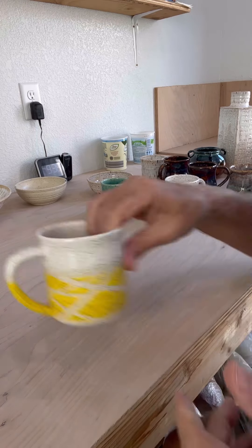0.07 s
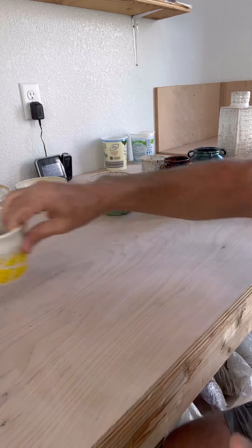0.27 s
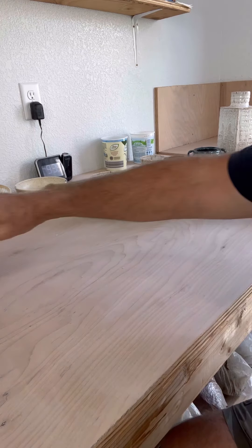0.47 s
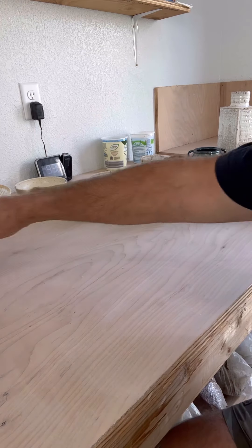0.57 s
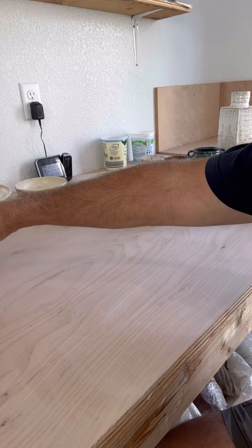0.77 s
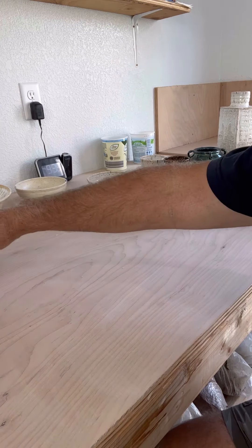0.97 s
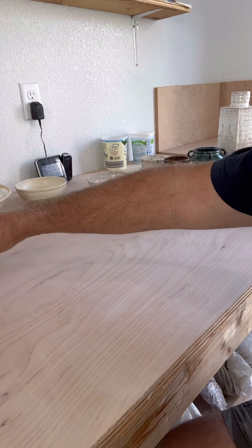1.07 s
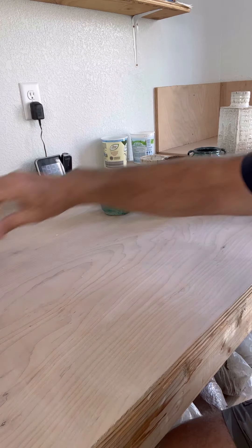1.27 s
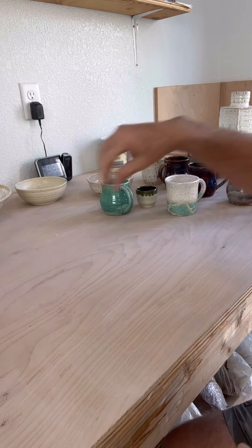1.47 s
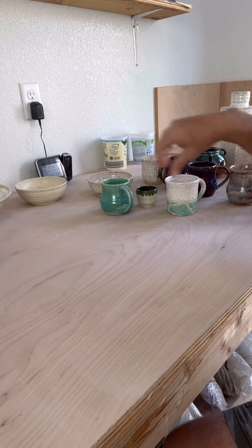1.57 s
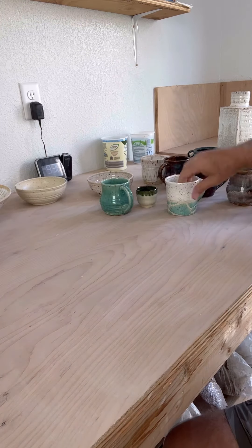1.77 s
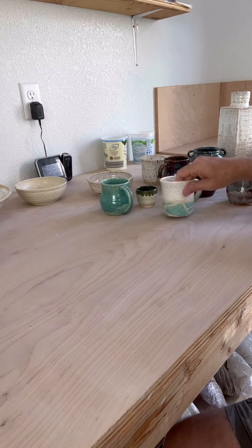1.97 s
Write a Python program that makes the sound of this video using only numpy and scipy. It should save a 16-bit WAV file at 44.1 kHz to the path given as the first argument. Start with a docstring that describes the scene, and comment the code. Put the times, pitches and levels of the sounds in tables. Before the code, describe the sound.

A ceramic mug is set down on a wooden countertop at about 1 second: one sharp knock with a low thud, a faint clink and a brief small-room echo. Before it, in the first 0.4 seconds, fingers tick faintly on the mug. From about 1.5 to 1.9 seconds come faint rustles and a few soft, dull bumps as a second mug is picked up. Low room noise lies underneath.

```python
"""A glazed mug is set down on a wooden countertop in a small, hard-walled room.
Its foot touches, tips flat and settles within 20 ms. Each impact excites damped modes: the board
knocks, the slab thuds, the hand-damped mug clinks faintly, and the room reverberates.
Later the hand takes hold of a second mug with a few soft bumps. Friction of arm and fingers adds
faint rustles and ticks, and a low room noise lies under it all."""
import sys
import numpy as np
from scipy import signal
from scipy.io import wavfile
from scipy.ndimage import uniform_filter1d

SR = 44100
rng = np.random.default_rng(int(sys.argv[2]) if len(sys.argv) > 2 else 0)


def dump_mix(stems):
    """Bounce the given channels to the path in sys.argv[1] as a 16-bit WAV at rate SR."""
    frames = np.atleast_2d(stems).T  # one column per channel
    limited = np.clip(frames, -1, 1)  # hard clip at full scale
    pcm = np.round(limited * 32767).astype(np.int16)
    wavfile.write(sys.argv[1], SR, pcm)


N = 89170
T = np.arange(N) / SR

# Coherence of left and right. Each row: frequency in Hz, correlation (limited to about 1 in use).
COHERENCE = [(60, 2.8), (170, 1.6), (300, 0.97), (520, 0.48), (900, 0.14), (2500, 0), (5000, 0.42),
             (8000, -1), (13000, -0.45)]


def from_db(db):
    """Amplitude ratio of a level in decibels."""
    return 10 ** (np.asarray(db) / 20)


def at_hz(points, hz):
    """Interpolation of a table on a logarithmic frequency axis."""
    frequencies, values = np.array(points).T
    return np.interp(np.log(hz), np.log(frequencies), values)


def pan(db):
    """Channel gains for a left-minus-right level difference."""
    return from_db(np.array([[db], [-db]]) / 2)


def delay(channels, seconds):
    """Pure time delay of every channel."""
    return np.array([np.interp(T - seconds, T, channel, left=0) for channel in channels])


def excite(force, response):
    """A linear system's output: the force convolved with its stereo impulse response."""
    return signal.fftconvolve(np.atleast_2d(force), response, axes=1)[:, :N]


def rise(seconds):
    """Exponential build-up with the given time constant."""
    return 1 - np.exp(-T / seconds)


def decay(t60):
    """Exponential damping by 60 dB in t60 seconds."""
    return np.exp(-np.minimum(np.log(1000) * T / t60, 40))


def evened(band, window_s=.04):
    """Division by the running rms steadies a band, so that it can decay smoothly."""
    running_power = uniform_filter1d(np.mean(band ** 2, axis=0), size=int(window_s * SR))
    return band * np.sqrt(np.mean(band ** 2) / running_power)


def partly_coherent(mid, side, correlation):
    """Sum and difference of two independent noises give a pair with a set correlation."""
    return np.sqrt(1 + correlation) * mid + np.sqrt(1 - correlation) * side * [[1], [-1]]


def banded_noise(spectrum, t60s=None):
    """Third-octave synthesis of stereo noise, starting near rms 1; each band may decay at its own rate."""
    # Stereo balance. Each row: frequency in Hz, left minus right in dB.
    balance = [(150, -0.5), (330, 0), (740, 2.5), (2200, 4.5), (4500, 0), (12000, 0.5)]
    edges = 20 * 2 ** (np.arange(30) / 3)
    white = rng.standard_normal((2, 2, N + SR // 2))
    out, power = 0, 0
    for k, (low, high) in enumerate(zip(edges, edges[1:])):
        bandpass = signal.butter(3, [low, high], "band", fs=SR, output="sos")
        mid, side = signal.sosfilt(bandpass, white[k % 2])[:, -N:]
        hz = np.sqrt(low * high)
        correlation = np.clip(at_hz(COHERENCE, hz), -1, .997)
        gain = from_db(at_hz(spectrum, hz))
        band = gain * pan(at_hz(balance, hz)) * partly_coherent(mid, side, correlation)
        out += evened(band) * decay(at_hz(t60s, hz)) if t60s else band
        power += gain ** 2 * (high - low) * 2 / SR
    return out / np.sqrt(power)


def ringing(modes, rise_cycles=.68):
    """Superposition of damped modes; each takes about a cycle to swell, so the lows speak last."""
    return sum(from_db(db) * pan(side_db) * np.sin(2 * np.pi * hz * T)
               * decay(t60) * rise(rise_cycles / hz) for hz, db, t60, side_db in modes)


def room_hush(level_db=-56.5):
    """Stationary broadband noise fills the room, strongest in the bass."""
    # Each row: frequency in Hz, relative spectral density in dB.
    spectrum = [(30, -10), (57, -2.5), (115, -9.5), (240, 1.5), (400, -10), (700, -8), (1100, -15.5),
                (2250, -25), (2900, -35), (4500, -41.5), (6500, -43), (8800, -50), (12000, -45),
                (15500, -51.5)]
    return from_db(level_db) * banded_noise(spectrum)


def room_boom(hz=56, level_db=-65.5):
    """Resonance: the lowest standing wave hums as a narrow band of the room's noise."""
    resonance = signal.butter(2, [hz * .94, hz * 1.06], "band", fs=SR, output="sos")
    noise = signal.sosfilt(resonance, rng.standard_normal(N + SR))[-N:]
    return from_db(level_db) * noise / noise.std()


def rustles(uneven_db=1):
    """Sliding friction of arm, fingers and the mugs' feet makes brief, uneven swells of noise."""
    # Each row: centre time and length in seconds, level in dB, lower and upper band edge in Hz.
    rubs = [(0.138, 0.088, -76, 3470, 5170), (.285, .03, -73, 9800, 15000), (0.292, .05, -78, 3320, 7600),
            (0.307, 0.1, -80, 4040, 4250), (0.488, 0.048, -83, 4000, 15000), (.83, 0.22, -79.5, 4200, 4590),
            (0.959, .003, -55.5, 2770, 5200), (1.52, 0.22, -80.5, 5200, 7200),
            (1.604, 0.23, -76.5, 3620, 4700), (1.61, 0.37, -69.5, 1360, 3200),
            (1.785, 0.2, -81, 3700, 4800), (1.807, 0.27, -67.5, 1490, 2570),
            (1.78, 0.06, -81, 12000, 15400), (1.817, 0.11, -50.5, 49.5, 79), (1.862, 0.078, -51, 195, 298)]
    out = 0
    for centre, length, db, low, high in rubs:
        bandpass = signal.butter(3, [low, high], "band", fs=SR, output="sos")
        mid, side = signal.sosfilt(bandpass, rng.standard_normal((2, N)))
        noise = partly_coherent(mid, side, np.clip(at_hz(COHERENCE, low), -1, 1))
        grip = uniform_filter1d(rng.standard_normal(N), size=500)
        swell = np.exp(-(2 * (T - centre) / length) ** 2)
        out += from_db(db + uneven_db * grip / grip.std()) * swell * noise / noise.std()
    return out


def finger_ticks():
    """Shifting fingers excite modes of the carried mug: at once for a tap, swelling for a slip."""
    # Each row: start in seconds, level in dB, frequency in Hz, t60 and rise time in seconds.
    touches = [(.128, -53.5, 4200, 0.0092, .0003), (0.267, -67, 4100, 0.083, .012),
               (0.277, -64.5, 3430, 0.078, .006), (0.279, -61.5, 7080, 0.063, 0.0088),
               (0.334, -65.5, 4120, 0.064, .003)]
    return sum(delay(ringing([(hz, db, t60, 0)]) * rise(rise_s), start)
               for start, db, hz, t60, rise_s in touches)


def contact_force(contacts):
    """Each impact is a low-passed impulse: a softer contact lasts longer and sounds duller."""
    force = np.zeros(N)
    for start, db, cutoff_hz in contacts:
        impulse = np.full(N, 1e-18)
        impulse[int(start * SR)] = from_db(db)
        force += signal.sosfilt(signal.butter(2, cutoff_hz, fs=SR, output="sos"), impulse)
    return force


def set_down_force():
    """Hard impacts give a broadband force as the mug's foot touches, tips flat and settles."""
    # Each row: start in seconds, strength in dB, cutoff in Hz.
    contacts = [(.9498, -27, 2400), (.9505, 3, 1500), (.9559, -16, 1180), (.9669, -11.4, 1980)]
    return contact_force(contacts)


def knocks(force, right_lag_s=.00008):
    """Board and mug vibrate freely after each push; the wood's dense modes crack, the glaze clicks."""
    # Modes of the countertop and of the finger-damped mug.
    # Each row: frequency in Hz, level in dB, t60 in seconds, left minus right in dB.
    board_modes = [(190, -25.5, 0.12, -2), (285, -16, 0.11, 1), (381.7, -4, 0.031, 0.5),
                   (448, -7, 0.064, -3.5), (569, -14.5, .074, -6.5), (617.7, -12.5, 0.1, 1),
                   (687, -2, 0.023, 4), (843, -9, 0.053, 3.5), (891, -23.5, .09, 2.5),
                   (986, -7.5, 0.02, 5.5), (1077, -22.5, 0.049, 12.5), (1348, -14, 0.021, 1)]
    mug_modes = [(1626, -25.5, .085, 7), (1746, -36.5, 0.17, 10.5), (2038, -44, .45, 7.5),
                 (2204, -41, .15, 8), (2835, -50, .1, -2), (3040, -37, 0.059, 4), (3400, -49.5, .14, 2),
                 (4150, -33.5, 0.093, 4.5), (4780, -41.5, .05, 3.5)]
    # Spectra of wood and hard glaze. Each row: frequency in Hz, relative spectral density in dB.
    wood_spectrum = [(100, -44.5), (350, -27), (950, 12.5), (1550, -6), (2200, -7.5), (2900, -18),
                     (4200, -11), (7500, -22), (11000, -9.5), (14000, -11.5)]
    glaze_spectrum = [(2500, -10), (4200, -10), (7500, -5.5), (11000, -2), (15000, 2)]
    crack = from_db(-24.5) * banded_noise(wood_spectrum) * decay(t60=.2) * rise(seconds=.0053)
    click = from_db(-19) * banded_noise(glaze_spectrum) * decay(t60=.022)
    left, right = ringing(board_modes) + ringing(mug_modes)
    ring = np.vstack([left, delay([right], right_lag_s)])  # the wave reaches the left first
    return excite(force, ring + crack + click)


def slab_thud(force):
    """Bending modes: the whole slab flexes a moment later, with a low thud."""
    # Each row: frequency in Hz, level in dB, t60 in seconds, left minus right in dB.
    slab_modes = [(105.5, -18, 0.054, 1), (161.8, -8, 0.049, 0)]
    return delay(excite(force, ringing(slab_modes)), seconds=.0133)


def reverberation(force):
    """The counter radiates into the room, building up a diffuse field and exciting standing waves."""
    # Colour of the diffuse field. Each row: frequency in Hz, relative spectral density in dB.
    spectrum = [(50, -18.5), (120, -21.5), (190, -12.5), (260, -8.5), (430, -4.5), (600, -4), (850, -15.5),
                (1400, -19), (2100, -24), (3000, -35.5), (4300, -34.5), (6000, -35.5), (9000, -34),
                (13000, -30)]
    # Standing waves. Each row: frequency in Hz, level in dB, left minus right in dB.
    room_modes = [(59.6, -43.5, -1.5), (87.4, -36.5, 0), (170.4, -40, -1.7), (216.7, -38, 1.5),
                  (262, -29.5, -2.5), (354, -35, -0.5), (383, -36.5, 4), (409, -42.1, 4), (418, -36, 0.1),
                  (459.8, -24, 0.7), (500, -31, 4), (610, -37, 3), (711, -39, -2.5), (829, -35.5, 7)]
    # Decay of the diffuse field and of the standing waves. Each row: frequency in Hz, t60 in seconds.
    diffuse_t60 = [(60, 0.94), (200, 0.66), (500, 0.55), (1200, 0.64), (2500, 0.65), (6000, 0.52),
                   (14000, 0.28)]
    mode_t60 = [(58, .8), (170, .55), (450, .45), (840, .42)]
    diffuse = from_db(-23.5) * banded_noise(spectrum, diffuse_t60) * rise(seconds=.02)
    standing = ringing([(hz, db, at_hz(mode_t60, hz), side_db) for hz, db, side_db in room_modes])
    return delay(excite(force, diffuse), seconds=.016) + delay(excite(force, standing), seconds=.036)


def pick_up_force():
    """Soft impacts give a weak, low-frequency force as the second mug is gripped and lifted."""
    # Each row: start in seconds, strength in dB, cutoff in Hz.
    bumps = [(1.664, -27.5, 210), (1.7675, -28, 400), (1.7755, -30.5, 336), (1.807, -23.5, 150),
             (1.832, -48, 396), (1.879, -35, 292)]
    return contact_force(bumps)


def scene():
    """Superposition of the impacts, the room's response, its steady noise and the handling sounds."""
    force = set_down_force() + pick_up_force()
    impacts = knocks(force) + slab_thud(force) + reverberation(force)
    return impacts + room_hush() + rustles() + finger_ticks() + room_boom()


def record(dry):
    """Band limiting and soft saturation: deep bass is cut, the highest peaks rounded, the top cut."""
    low_cut_hz, top_hz = 49.2, 15700
    thinned = signal.sosfilt(signal.butter(6, low_cut_hz, "high", fs=SR, output="sos"), dry)
    rounded = thinned / (1 + thinned ** 10) ** (1 / 10)
    return signal.sosfilt(signal.cheby2(12, 70, top_hz * 1.08, fs=SR, output="sos"), rounded)


dry = scene()
out = record(dry)
dump_mix(out)
```